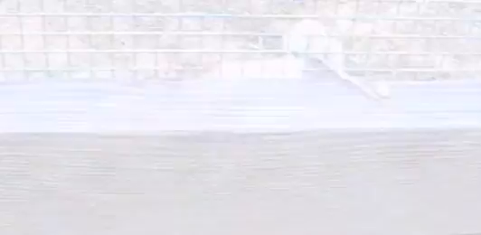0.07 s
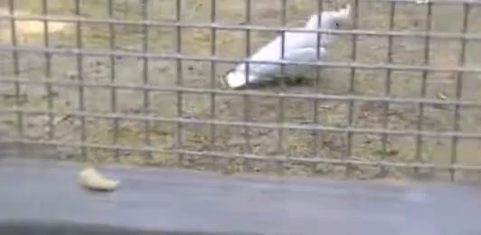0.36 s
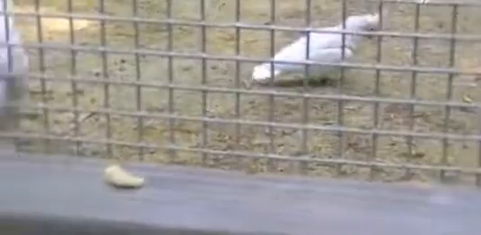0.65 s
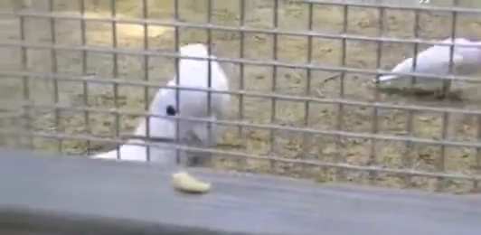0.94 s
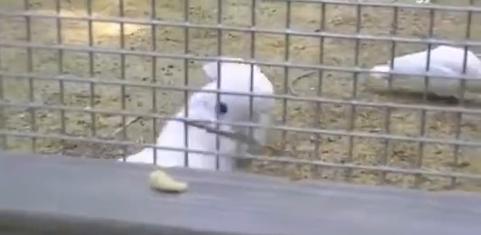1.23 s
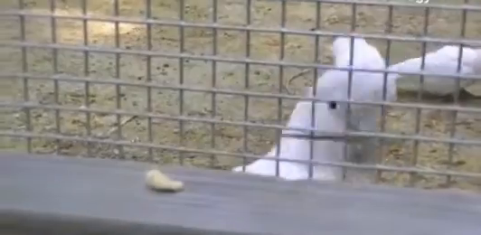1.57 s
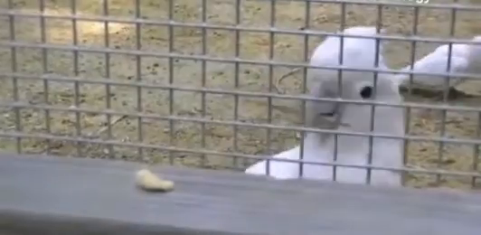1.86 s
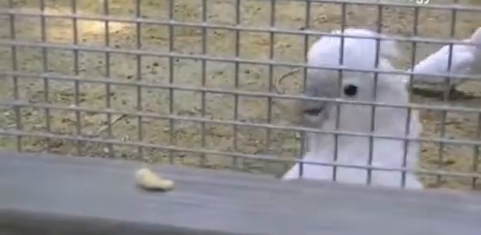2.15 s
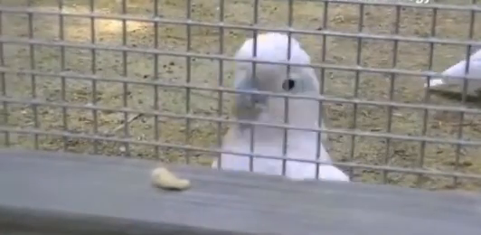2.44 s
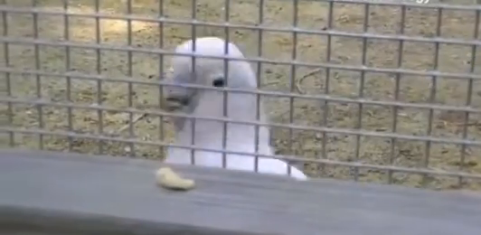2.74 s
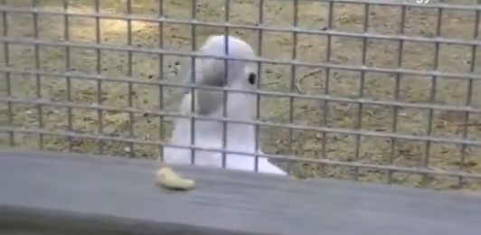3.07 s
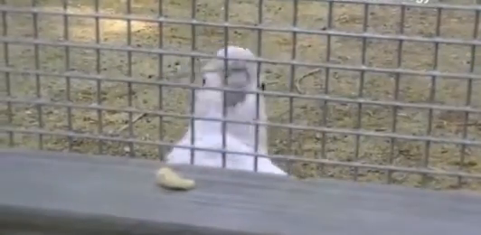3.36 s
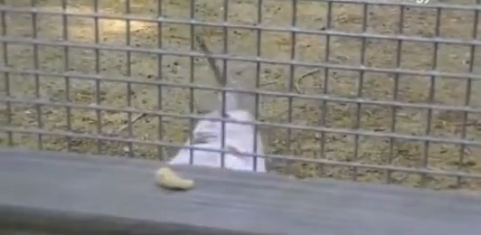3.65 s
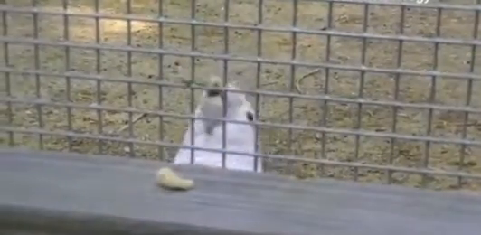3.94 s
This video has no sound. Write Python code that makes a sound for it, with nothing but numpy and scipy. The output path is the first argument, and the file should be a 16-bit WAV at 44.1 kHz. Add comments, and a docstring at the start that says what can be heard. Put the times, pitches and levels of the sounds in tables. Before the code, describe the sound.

Light stick taps on wood and wire mesh follow the fading echo of a parrot's screech in a quiet outdoor aviary. The nearby knocks grow sparser and end in soft scraping, while a far-off bird whistles thinly.

```python
"""Cockatoo with a stick in an aviary

A cockatoo knocks a stick on the wooden rail and wire mesh of an outdoor aviary and scrapes it along.
Blows ring the modes of wood and frame; scrapes are dense tiny slips; the enclosure reflects both.
The quiet yard opens half a second in, on the dying echo of a parrot's screech. Two thin whistles and
a chirp, perhaps a far-off bird, follow one another over faint air, hiss and electrical whine."""
import sys
import numpy as np
from scipy import signal
from scipy.fft import rfft, irfft
from scipy.io import wavfile
from scipy.ndimage import uniform_filter1d

SR = 44100
rng = np.random.default_rng(int(sys.argv[2]) if len(sys.argv) > 2 else 0)


def int16_out(signal):
    """Quantize to a 16-bit WAV file."""
    q = np.round(np.clip(np.atleast_2d(signal).T, -1, 1) * 32767)
    wavfile.write(sys.argv[1], SR, q.astype(np.int16))


N = 176400
CONTACT_RISE_S = .0012

# Spectrum of stick on wire mesh: freq_hz, relative_db
WIRE_SPECTRUM = [(500, -35), (2500, -8), (4000, -1), (5400, -1), (8300, -5), (9400, -11), (10500, -38),
                 (15000, -49)]


def blows():
    """Each blow cracks, rings the wood, shakes the frame, clacks and ticks on the wire."""
    # Blows, levels before the spot lift:
    # start_s, wood_db, clack_db, tick_db, frame_db, crack_db, crack_hz, spot_hz
    strikes = [(0.7803, -46, -53, -68, -62, -47, 2800, 1000), (.935, -53, -60, -59, -57.5, -54, 1700, 1790),
               (1.069, -52.5, -54, -44, -51, -39, 5900, 5960),
               (1.2468, -43, -53, -52, -56, -42, 5000, 5100), (1.329, -53, -61, -72, -64, -51, 2100, 660),
               (1.8417, -43, -45.5, -59, -53.5, -36, 1950, 652),
               (2.3992, -44.5, -49, -67, -61, -39, 2300, 1380)]
    # Modes of stick and rail: freq_hz, relative_db, t60_s
    wood_modes = [(444, -4, 0.069), (666, -2, 0.058), (816, -3, 0.058), (895, -1.5, 0.045),
                  (1041, -8, 0.07), (1344, -6, 0.04), (1725, -8, 0.034), (2050, -6.5, 0.035),
                  (2785, -13, 0.073)]
    # Modes of the fence frame: freq_hz, relative_db, t60_s
    frame_modes = [(101, -2, 0.11), (164, -1, 0.088), (202, 0.5, 0.14)]
    # Spectrum of the contact clack: freq_hz, relative_db
    clack_spectrum = [(100, 6.5), (400, 0), (1450, 9), (1900, -0.5), (2350, -5), (2800, -1.5), (4200, -12),
                      (5500, -30), (12000, -57)]
    out, t = np.zeros(N), np.arange(SR // 4) / SR
    for start_s, wood_db, clack_db, tick_db, frame_db, crack_db, crack_hz, spot_hz in strikes:
        snap = amp(crack_db) * crack(t, crack_hz)
        wood = amp(wood_db) * ring(t, wood_modes)
        frame = amp(frame_db) * ring(t, frame_modes)
        clack = amp(clack_db) * burst(t, clack_spectrum, t60_s=.04)
        tick = amp(tick_db) * burst(t, WIRE_SPECTRUM, t60_s=.023)
        add(out, start_s, spot_lift(snap + wood + frame + clack + tick, spot_hz))
    return out


def crack(t, pitch_hz, peak_cycles=.7):
    """First touch of the stick: a snap of a few cycles."""
    age = t * pitch_hz / peak_cycles
    return age * np.exp(1 - age) * np.sin(2 * np.pi * pitch_hz * t)


def ring(t, modes, spread_db=2.5, attack_s=.0014):
    """Decaying modes; random weights stand for where the blow lands."""
    freq_hz, relative_db, t60_s = np.transpose(modes)[:, :, None]
    weight = amp(relative_db + spread_db * rng.standard_normal(freq_hz.shape))
    waves = np.sin(2 * np.pi * (freq_hz * t + rng.random(freq_hz.shape))) * amp(-60 * t / t60_s)
    attack = np.minimum(t / attack_s, 1)
    return attack * (weight * waves).sum(0) * np.sqrt(2 / (weight ** 2).sum())


def burst(t, spectrum, t60_s, rise_s=CONTACT_RISE_S):
    """Dense, fast-dying clatter, with the same energy on every draw."""
    envelope = np.minimum(t / rise_s, 1) * amp(-60 * t / t60_s)
    noise = coloured(rng.standard_normal(len(t)), spectrum)
    return unit(noise * envelope) * np.sqrt(np.mean(envelope ** 2))


def spot_lift(x, spot_hz, lift_db=8, half_width_oct=.049):
    """The touched spot brings out one narrow band."""
    octaves = np.log2((np.fft.rfftfreq(len(x), 1 / SR) + 1) / spot_hz)
    response = 1 + (amp(lift_db) - 1) / (1 + 1j * octaves / half_width_oct)
    return irfft(rfft(x) * response, len(x))


def taps(clatter_db=-7, skirt_db=-16):
    """Light taps and rebounds of the tip only snap and clatter."""
    # Tip contacts: start_s, level_db, pitch_hz
    touches = [(.8545, -52, 6000), (.87, -56, 5800), (.963, -48, 1900), (.988, -57, 8500),
               (1.034, -54, 2400), (1.293, -47, 2000), (1.315, -48, 800), (1.591, -55, 8300),
               (2.406, -44.5, 1050), (2.761, -54, 1600), (3.4, -55, 1300), (3.6385, -49, 3800),
               (1.851, -44, 2900), (3.1115, -46, 2800)]
    out, t = np.zeros(N), np.arange(SR // 4) / SR
    for start_s, level_db, hz in touches:
        spectrum = [(hz / 4, skirt_db), (hz, 0), (hz * 2, skirt_db), (hz * 4, 3 * skirt_db)]
        clatter = amp(clatter_db) * burst(t, spectrum, t60_s=.02)
        add(out, start_s, amp(level_db) * (crack(t, hz) + clatter))
    return out


def bumps():
    """Soft, low bumps on the fence."""
    # Bumps: start_s, level_db
    thuds = [(0.705, -51.5), (1.034, -58.5), (1.379, -56), (2.126, -55.5), (2.355, -54.5), (2.927, -56.5),
             (3.106, -55.5)]
    # Spectrum of a bump: freq_hz, relative_db
    spectrum = [(30, -5.5), (75, -0.5), (200, -13), (600, -60)]
    out, t = np.zeros(N), np.arange(SR // 4) / SR
    for start_s, level_db in thuds:
        add(out, start_s, amp(level_db) * burst(t, spectrum, t60_s=.13, rise_s=.0044))
    return out


def scrapes(slips_per_s=7000, spread_db=2, rise_s=.0038, fall_s=.054):
    """Tiny slips of uneven size as the stick drags over wood and wire."""
    # Drags, levels before the spot lift: start_s, length_s, wood_db, wire_db, spot_hz
    drags = [(0.923, 0.073, -59.5, -63.5, 1050), (1.204, 0.067, -62.5, -74, 540),
             (1.281, 0.084, -61, -72.5, 1950), (1.406, 0.046, -60.5, -72, 990),
             (1.778, 0.031, -95, -68, 7300), (3.226, 0.14, -75, -72.5, 6440), (3.376, 0.29, -82, -76, 6350),
             (3.652, 0.035, -67.5, -70.5, 3400), (3.931, 0.042, -61, -83, 1150)]
    # Spectrum of rubbed wood: freq_hz, relative_db
    wood_spectrum = [(150, -13), (450, 5), (900, 1), (1200, -4.5), (1800, -3), (2600, -13.5), (4000, -25.5),
                     (9000, -47)]
    slips = rng.standard_normal(N) * (rng.random(N) < slips_per_s / SR)
    slips *= amp(spread_db * np.minimum(rng.exponential(1, N), 3))
    rub, rasp = coloured(slips, wood_spectrum), coloured(slips, WIRE_SPECTRUM)
    out, t = np.zeros(N), np.arange(N) / SR
    for start_s, length_s, wood_db, wire_db, spot_hz in drags:
        press = np.clip((t - start_s) / rise_s, 0, 1)
        release = np.clip((start_s + length_s - t) / fall_s + .5, 0, 1)
        out += press * release * spot_lift(amp(wood_db) * rub + amp(wire_db) * rasp, spot_hz)
    return out


def echo(x, t60_s=.31, reflections_per_s=2000, gap_s=.004):
    """Scattered reflections from the enclosure, different at each ear."""
    t = np.arange(SR // 3) / SR
    response = rng.standard_normal((2, len(t))) * (rng.random((2, len(t))) < reflections_per_s / SR)
    response *= (t > gap_s) * amp(-60 * t / t60_s)
    response /= np.linalg.norm(response, axis=1, keepdims=True)
    return signal.fftconvolve(x[None], response, axes=1)[:, :N]


def screech_tail(start_s, level_db=-56.5, hold_s=.048, t60_s=1.5):
    """The diffuse echo of a parrot's screech dies away across the yard."""
    # Spectrum of the echo: freq_hz, relative_db
    spectrum = [(750, -33), (1450, -1), (1900, -8), (2400, -4), (2600, 3), (2820, 0.5), (3200, -10),
                (3850, -2.5), (4600, -14.5), (7500, -38)]
    decay_s = np.maximum(np.arange(N) / SR - start_s - hold_s, 0)
    return amp(level_db - 60 * decay_s / t60_s) * coloured(rng.standard_normal(N), spectrum)


def whistles(waver_rms_hz=10, warble_hz=163, flutter_hz=48):
    """Thin notes, part pure and part fluttering, with a slow waver and a fast warble."""
    # Contours of two whistles and a chirp, one list each: time_s, pitch_hz, level_db
    notes = [
        [(1.27, 4850, -78), (1.52, 4855, -71.5), (2.06, 4824, -67.5), (2.11, 4885, -66), (2.18, 4890, -72),
         (2.21, 4800, -75), (2.235, 4840, -64.5), (2.29, 4815, -64.5), (2.41, 4860, -78.5)],
        [(2.39, 5280, -80), (2.53, 5250, -84), (2.555, 5268, -71.5), (2.65, 5268, -76), (2.69, 5260, -84),
         (2.83, 5200, -84), (2.985, 5280, -76)],
        [(3.295, 5080, -77), (3.325, 4970, -76)],
    ]
    # Grain of each note: warble_rad, flutter_share
    grains = [(.55, .45), (.1, .12), (.6, .5)]
    out = np.zeros(N)
    for note, (warble_rad, flutter_share) in zip(notes, grains):
        time_s, pitch_hz, level_db = np.transpose(note)
        t = np.arange(time_s[0], time_s[-1], 1 / SR)
        contour_hz = np.interp(t, time_s, pitch_hz) + waver_rms_hz * drift(len(t), cutoff_hz=23)
        warble = warble_rad * np.sin(phase(warble_hz * (1 + .14 * drift(len(t), cutoff_hz=47))))
        scatter = drift(len(t), flutter_hz) + 1j * drift(len(t), flutter_hz)
        flutter = np.sqrt(1 - flutter_share) + np.sqrt(flutter_share / 2) * scatter
        tone = flutter * np.exp(1j * (phase(contour_hz) + warble))
        envelope = amp(np.interp(t, time_s, level_db)) * signal.windows.tukey(len(t), .03)
        add(out, time_s[0], envelope * unit(tone.real))
    return out


def yard_air(level_db=-63.5):
    """Gently shifting outdoor air, wider in the treble."""
    # Spectrum of the air: freq_hz, relative_db
    spectrum = [(25, 6.5), (60, -2), (140, -9), (210, 0.5), (330, -1.5), (500, -4.5), (800, -8),
                (1900, -12), (7000, -17), (9500, -24), (15500, -29)]
    # Likeness of left and right: freq_hz, correlation
    likeness = [(3000, 1), (7000, 0.83), (15000, 0.19)]
    return amp(level_db) * stereo_noise(lambda hz: lookup(likeness, hz), spectrum, patch_db=1.5)


def hush(level_db=-70, correlation=.38):
    """Faint steady hiss and rumble."""
    # Spectrum of the hush: freq_hz, relative_db
    spectrum = [(25, 23.5), (80, 5), (140, -18), (220, -17.5), (330, 6.5), (800, 1), (15500, -4)]
    return amp(level_db) * stereo_noise(lambda hz: np.full_like(hz, correlation), spectrum, patch_db=0)


def whine(high_hz=11460, high_db=-84.5, low_hz=2535, low_db=-79):
    """Electrical self-noise: a steady high line and a lower one whose pitch swings."""
    cycle_s, crest_s, swing_hz = .06, .023, 123
    t = np.arange(N) / SR
    turn = 2 * np.pi * (t - crest_s) / cycle_s
    pitch_hz = low_hz + swing_hz * (np.cos(turn) + np.cos(2 * turn))
    steady = amp(high_db) * np.sin(2 * np.pi * high_hz * t)
    swinging = amp(low_db) * np.sin(phase(pitch_hz))
    return np.sqrt(2) * (steady + swinging)


def stereo_noise(correlation_at, spectrum, patch_db):
    """Two channels of partly shared noise with drifting level patches, rms 1."""
    hz = np.fft.rfftfreq(2048, 1 / SR)
    left_re, left_im, own_re, own_im, patches = rng.standard_normal((N // 512 + 5, len(hz), 5)).T
    patches = uniform_filter1d(patches, size=20, axis=0)  # over frequency
    patches = unit(uniform_filter1d(patches, size=7, axis=1))  # over time
    shared = np.clip(correlation_at(hz), -1, 1)[:, None]
    left = left_re + 1j * left_im
    right = shared * left + np.sqrt(1 - shared ** 2) * (own_re + 1j * own_im)
    frames = np.array([left, right]) * amp(lookup(spectrum, hz)[:, None] + patch_db * patches)
    return unit(signal.istft(frames, nperseg=2048, noverlap=1536)[1][:, :N])


def drift(size, cutoff_hz):
    """Slow random motion, rms about 1."""
    passband = np.fft.rfftfreq(N, 1 / SR) < cutoff_hz
    return unit(irfft(rfft(rng.standard_normal(N)) * passband, N))[:size]


def coloured(x, spectrum):
    """Filter by a spectrum table, rms 1."""
    gain = amp(lookup(spectrum, np.fft.rfftfreq(len(x), 1 / SR)))
    return unit(irfft(rfft(x) * gain, len(x)))


def lookup(points, hz):
    """Interpolate on a log-frequency axis."""
    freq_hz, value = np.transpose(points)
    return np.interp(np.log(hz + 1), np.log(freq_hz + 1), value)


def phase(hz):
    """Running phase in radians."""
    return 2 * np.pi * np.cumsum(hz) / SR


def amp(db):
    """Decibels to gain."""
    return 10 ** (np.asarray(db) / 20)


def unit(x):
    """Scale to rms 1."""
    return x / np.sqrt(np.mean(x ** 2) + 1e-20)


def add(mix, start_s, sound):
    """Mix a sound in at start_s."""
    part = mix[round(start_s * SR):][:len(sound)]
    part += sound[:len(part)]


def scene(open_s=.506, fade_s=.011):
    """Stick, birds, yard and whine open together over the steady hush."""
    stick = blows() + taps() + bumps() + scrapes()
    song = whistles()
    air = yard_air()
    stick = stick + amp(-22) * echo(stick)
    song = song + amp(.5) * echo(song).mean(0)  # mono echo
    outdoors = stick + song + screech_tail(open_s) + air + whine()
    fade_in = np.clip((np.arange(N) / SR - open_s) / fade_s, 0, 1)
    return outdoors * fade_in + hush()


def record(dry, cutoff_hz=15700):
    """Band limit plus a constant electrical offset."""
    # DC offset, rows left and right: offset_full_scale
    dc_offset = [
        [-.068],
        [.0332],
    ]
    lowpass = signal.firwin(511, cutoff_hz, window=("kaiser", 9), fs=SR)
    return signal.oaconvolve(dry, lowpass[None], "same") + np.array(dc_offset)


dry = scene()
out = record(dry)
int16_out(out)
```